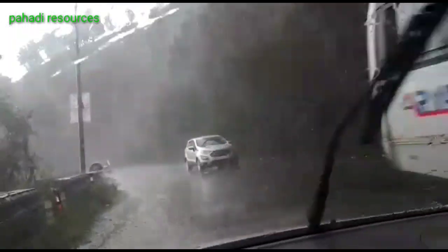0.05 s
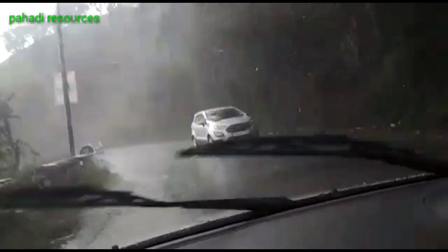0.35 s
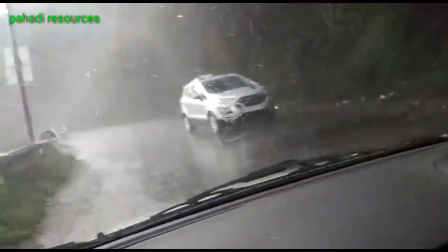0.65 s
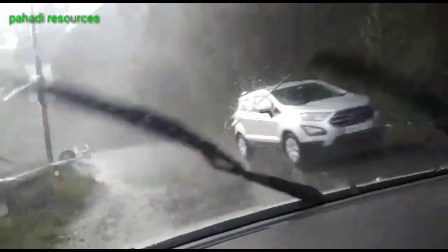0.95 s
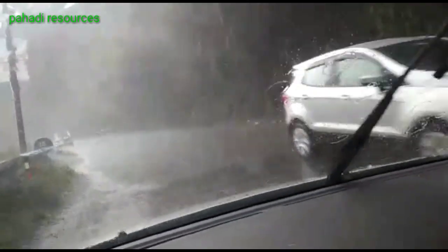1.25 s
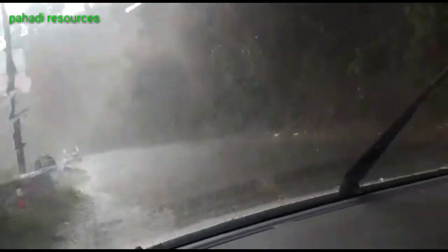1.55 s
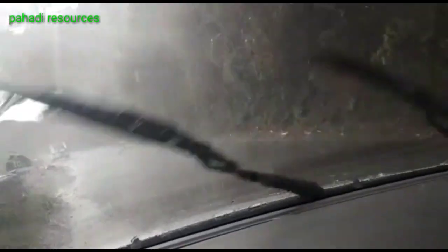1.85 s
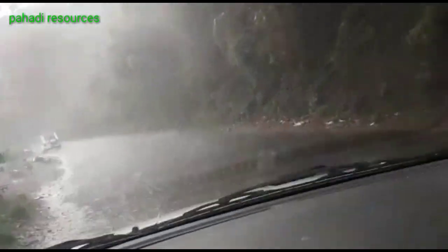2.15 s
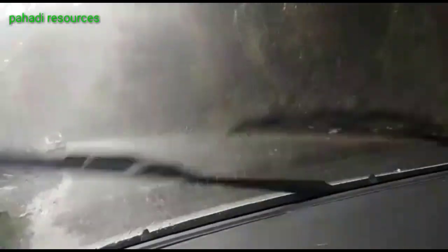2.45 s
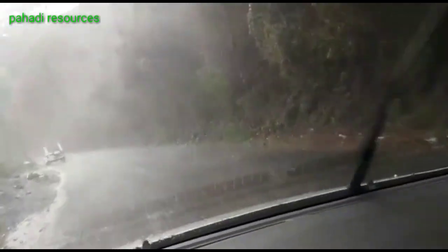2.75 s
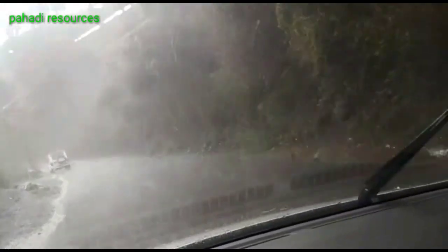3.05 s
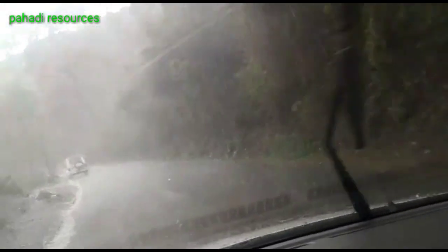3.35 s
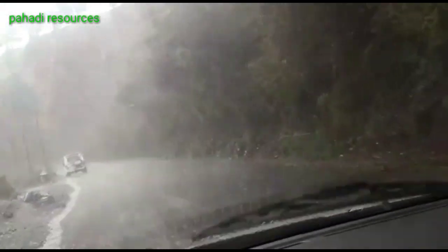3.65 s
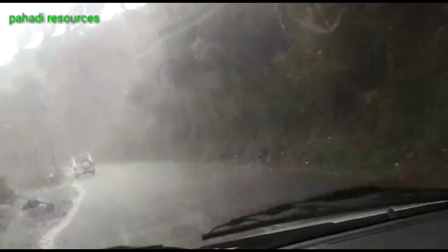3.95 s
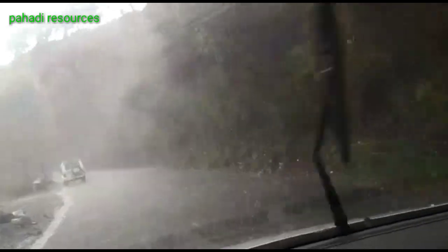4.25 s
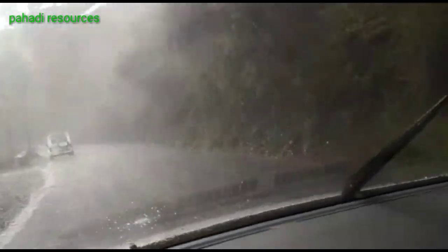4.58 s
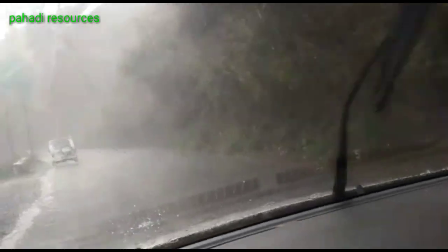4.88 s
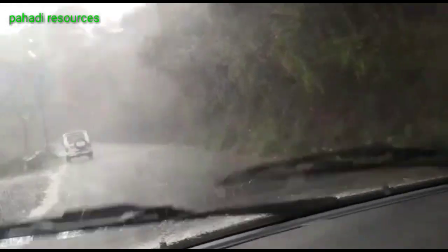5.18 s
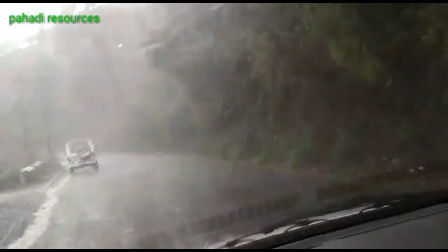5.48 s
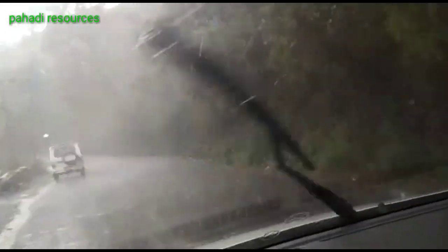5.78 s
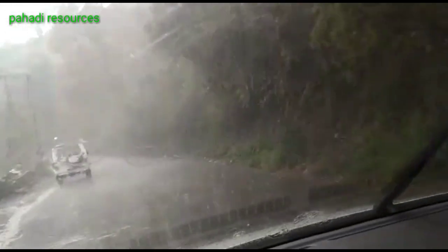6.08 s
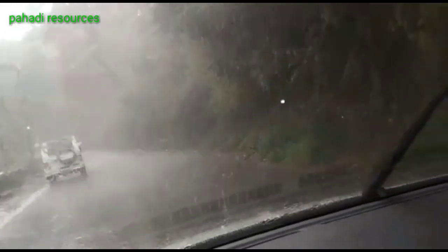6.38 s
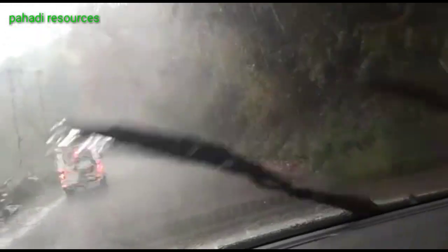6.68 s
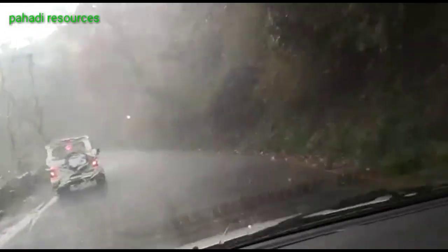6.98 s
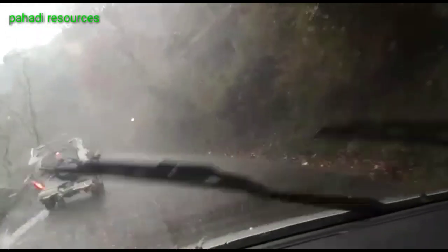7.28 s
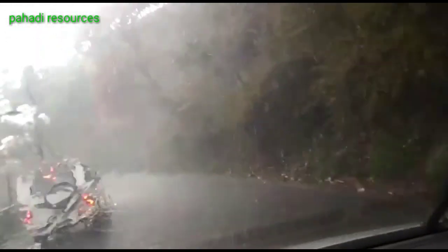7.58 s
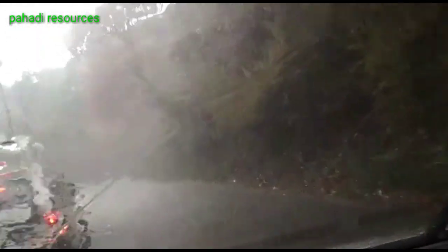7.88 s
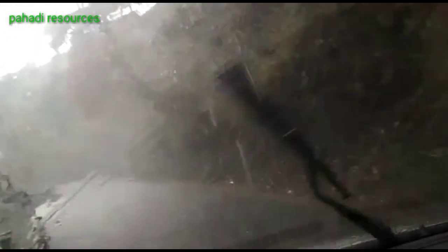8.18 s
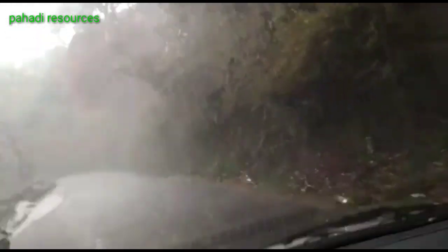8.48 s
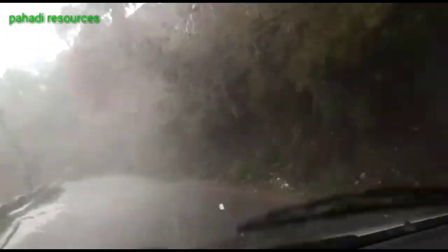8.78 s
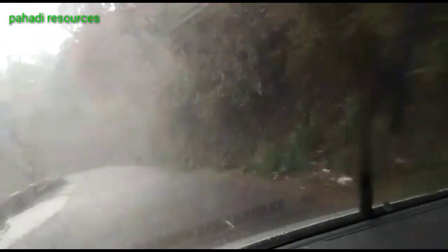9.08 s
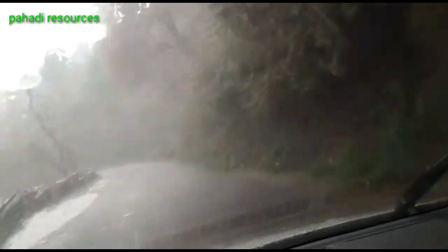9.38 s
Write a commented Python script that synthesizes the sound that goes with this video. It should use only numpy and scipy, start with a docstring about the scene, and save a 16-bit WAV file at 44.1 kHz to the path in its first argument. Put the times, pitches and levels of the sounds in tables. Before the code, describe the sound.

A downpour hits a car, heard from the cabin near the windshield. Clumps and sheets of water thud and patter on the roof with a hollow ring, over a low rumble of road and engine. Early on, an oncoming bus and then a car pass with a brief wet swish. After that, crisp, irregular ticks of single drops stand out from the fine hiss on the glass while the drumming carries on.

```python
"""Inside a slowly moving car in heavy rain, a stereo microphone close to the windscreen.
From the start, drops, clumps and sheets of water drum on the metal roof and ring in the cabin, rain hisses
on the glass, and road and engine rumble underneath. A bus splashes past at once, a car just before two
seconds. As their mist fades, hard drops begin to tick on the glass, each amid a flurry of small ones,
and keep on to the end."""
import sys
import numpy as np
from scipy import signal
from scipy.fft import rfft, irfft
from scipy.io import wavfile
from scipy.ndimage import uniform_filter1d

SR = 44100
rng = np.random.default_rng(int(sys.argv[2]) if len(sys.argv) > 2 else 0)


def put_to_file(sound):
    """Save the sound as 16-bit audio at rate SR, in the file named by the first command-line argument."""
    columns = np.atleast_2d(sound).T  # one column per channel
    safe = np.clip(columns, -1, 1)
    whole_steps = np.round(safe * 32767)
    wavfile.write(sys.argv[1], SR, whole_steps.astype(np.int16))


N = 424683

# Heavy clumps of water overhead. Each row: time in seconds, relative level in dB, patter and spatter trims
# in dB, the panel's note in Hz, its trim in dB, rough time from first drop to thickest in seconds.
ROOF_CLUMPS = [(0.229, -33.5, -17, -20, 558, -6, .01), (0.297, -42, -22, -33, 297, -5, 0.01),
               (0.392, -35, -19, -29, 377, -7.5, 0.009), (0.496, -22.5, -9.5, -34, 372, -12, 0.0054),
               (.519, -27, -7, -29, 331, -9, 0.0069), (0.559, -37.5, -2.5, -24, 288, -3.5, 0.012),
               (0.655, -35.5, -1.5, -20, 632, -12, .01), (0.82, -36, -11, -14, 415, -10.5, 0.0086),
               (0.99, -36.5, 0, -14, 542, -23, 0.013), (1.06, -38.5, -5, -12.5, 295, -0.5, 0.014),
               (1.12, -34.5, -6, -33, 376, -10, 0.0084), (1.272, -29, -10, -23, 392, -13.5, 0.0065),
               (1.375, -34, -15, -21, 435, -13, 0.011), (1.51, -34.5, -12, -34, 598, -12.5, 0.0022),
               (1.668, -37.5, -1, -9, 396, -3, 0.0095), (1.852, -28.5, -8.5, -20, 437, -11, .01),
               (1.944, -34, -8, -12, 402, -8, 0.013), (2.136, -36.5, -24, -18, 436, -10, 0.0073),
               (2.232, -46.5, -19, -3, 637.5, -1, .01), (2.459, -32, -5, -16, 431, -13, 0.011),
               (2.591, -25, -4.5, -28, 404, -5.5, 0.0092), (2.654, -30.5, -4, -35, 628, -7.5, .01),
               (2.717, -34, -9, -34, 370, -12, 0.011), (2.788, -40, -23, -40, 370, -4, 0.00996),
               (2.835, -35, -17, -32, 398, -13, 0.0058), (2.98, -47, -17, -30, 605, 1, .008),
               (3.018, -44.5, 2, -25, 598, -5.5, .009), (3.245, -41.5, -8, -23, 448.5, -23, 0.009),
               (3.52, -30.5, -5, -18, 604.4, -6.5, .016), (3.765, -29, -11, -19.5, 433, -5.5, 0.011),
               (3.82, -30, -24, -30, 428.3, -13, .006), (3.854, -33, -9, -30, 362, -8, 0.0031),
               (4.03, -50, 7, -1.5, 463, -5, 0.016), (4.194, -26.5, -1, -20, 278.6, -15, 0.017),
               (4.422, -32, -5, -17.5, 419, -23, 0.0093), (4.51, -46.5, 6.5, -7, 560, -5, 0.01),
               (4.666, -39, -4, -16, 444, -10.5, 0.0043), (4.73, -29, -14, -15.5, 389, -6, 0.0082),
               (4.838, -49.5, 9, 2, 590, -4, 0.011), (4.968, -44.5, -1, -9, 406.3, 2.5, 0.0065),
               (5.02, -44, -8, -30, 405, -6, .005), (5.047, -42.5, -11, -31, 393.6, -4, 0.0082),
               (5.2, -44, -4, -36, 586, -12, 0.0029), (5.269, -37, -16, -38, 609, -24, 0.0018),
               (5.373, -40.5, -5, -21, 490, -22, 0.002), (5.416, -48, 4, -20, 427, -23, 0.0017),
               (5.526, -41, -3, -35, 414, 1.5, 0.0095), (5.755, -32, -26, -17.5, 394, -5, .012),
               (5.79, -45, -19, -30, 420, 0, 0.0083), (5.877, -41.5, 4.5, -7, 404, -11, 0.0042),
               (6.015, -36.5, -22, -25, 416.4, -17, 0.0067), (6.173, -42.5, 3.5, -20, 417, -1, 0.0077),
               (6.22, -50, -12, -33, 403.5, 4, .007), (6.29, -35.5, -5, -27, 401, -5, 0.011),
               (6.494, -38.5, -11, -40, 421, -10, 0.014), (6.595, -39, -9, -36, 398, -3.5, .006),
               (6.639, -49, -4, -24, 404, -6, 0.0063), (6.748, -39.5, 1, -11.5, 604, -12, 0.006),
               (6.808, -37, -8, -18, 608, -9, 0.0021), (6.949, -35, -6, -21, 397.4, -5.5, 0.0084),
               (7.038, -36.5, -4, -22, 402.5, -1.5, 0.0073), (7.198, -40, -29, -9.5, 345, -6.5, 0.0091),
               (7.315, -44, 5, -20, 628, -3, 0.011), (7.408, -34.5, -2, -3.5, 554, -4.5, .011),
               (7.656, -37, 0, -29, 406, -2.5, 0.014), (7.767, -47, -5, -27, 448, -10, 0.0015),
               (7.851, -56, 11, 3, 403, 3, 0.0054), (7.885, -55, 9, 6, 422, -8, 0.016),
               (8.026, -35.5, -7, -21, 427.5, -9.5, 0.0072), (8.128, -33.5, -5, -18, 405, -8, 0.013),
               (8.203, -50, 12, 8, 441, -16, 0.013), (8.314, -32, -14, -24, 403, -9, .005),
               (8.435, -37.5, -7, -22, 405, -4.5, .012), (8.651, -58, 8, -20, 561, 1, .015),
               (8.828, -44.5, -0.5, -25, 444, -14, 0.0045), (8.877, -39, -2, -6, 605, -11, .014),
               (9.0, -35, -9, -12, 435, -9, 0.015), (9.245, -55, -11, -25, 420, -8, 0.012),
               (9.415, -50.5, 11.5, 1, 352.3, -7, .018), (9.536, -34.5, -13, -17, 304, -11, 0.014)]
# Bright modes set off by a spatter. Each row: pitch in Hz, trim in dB, time to fall 60 dB in seconds.
SPATTER_MODES = [(1470, -14, 0.17), (2150, -13.5, 0.22), (2330, -13, 0.14), (2710, -17, 0.17)]
# Water pouring across the roof. Each row: start and length in seconds, drumming and patter gains in dB.
ROOF_SHEETS = [(.13, .14, -40, -31), (0.415, 0.067, -31, -36), (1.31, 0.095, -31.5, -34),
               (1.443, 0.047, -36, -41), (1.882, 0.16, -34, -39), (2.61, 0.13, -37, -42),
               (3.292, 0.14, -57, -39.5), (3.421, 0.068, -37, -47), (3.558, 0.053, -34, -33),
               (4.114, 0.062, -38, -56), (4.333, 0.065, -44, -53), (4.464, .05, -48, -40),
               (4.672, 0.056, -33.5, -38), (4.968, .11, -38, -40), (5.11, .06, -47, -39.5),
               (5.503, .17, -40, -40), (5.722, .15, -34, -39.5), (6.098, 0.033, -45, -43.5),
               (6.2, 0.16, -34.5, -45), (6.496, .17, -30.5, -37.5), (6.857, .07, -32.5, -45),
               (6.931, 0.06, -40, -35.5), (7.06, 0.074, -32.5, -54), (7.24, .06, -39, -44),
               (7.423, 0.054, -49, -37.5), (7.67, 0.061, -31.5, -45), (8.175, 0.072, -43, -40),
               (8.87, .06, -33, -37), (9.073, .09, -43.5, -37)]
# Small drops overhead. Each row: time in seconds, relative level in dB.
ROOF_RAIN = [(0, -37), (.35, -37.5), (.75, -43), (1.22, -42.5), (1.6, -40.5), (2.05, -39), (2.35, -38.5),
             (2.9, -42), (3.2, -43.5), (3.5, -46), (3.78, -36.5), (3.98, -44), (4.3, -42.5), (4.6, -44),
             (4.9, -43.5), (5.25, -49.5), (5.8, -43.5), (6.2, -45.5), (6.44, -48), (6.8, -46), (7.1, -45),
             (7.6, -43.5), (8.1, -47.5), (9.63, -44.5)]
# Hard drops on the glass. Each row: time in seconds, relative level in dB, trim of the pane's ring in dB,
# left minus right in dB.
GLASS_TICKS = [(2.569, -50, -16, 2), (2.608, -26.5, -22, 3), (2.787, -26.5, -30, -1),
               (2.892, -37.5, -13, 16), (3.237, -32, -29, -7), (3.353, -33.5, -14, -8), (3.502, -48, -2, 3),
               (3.549, -32.5, -14, -9), (3.693, -28, -11, -6), (3.773, -28, -21, -3), (4.202, -37, -3, -2),
               (4.419, -34, -20, 3), (4.667, -29.5, -3.5, 1), (4.738, -31.5, 1, 4), (4.838, -31, -14, 6),
               (5.198, -36, -30, 1), (5.311, -23, -19, 0), (5.879, -27, -6, -2), (6.242, -27.5, -4.5, 5),
               (6.809, -30.5, -12, 7), (6.889, -26.5, -3.5, 6), (6.934, -24.5, -25, 0),
               (7.034, -39, -4, 12), (7.178, -28, -9, 3), (7.311, -29.5, -28, -6), (7.472, -22, -17, -3),
               (7.929, -32, -5, 5), (7.999, -34, -12, 8), (8.022, -28, -9, 6), (8.209, -33, -17, -6),
               (8.315, -20.5, -14.5, 1), (8.362, -28.5, -12.5, 7), (8.564, -33, -23, 9),
               (8.703, -34, 1.5, 0), (8.751, -29, -10, 8), (8.961, -50, 7, 14), (9.151, -45, 1, 7),
               (9.276, -36, -8, 6)]
# Rain on the windscreen. Each row: time in seconds, strength in dB.
GLASS_RAIN = [(0, -49), (.15, -46), (.5, -46), (.8, -48.5), (1.2, -51), (1.4, -49.5), (2, -47), (2.5, -50),
              (2.95, -52), (3.4, -50.5), (3.75, -48), (4.05, -53), (4.33, -50.5), (4.6, -50.5),
              (4.91, -49.5), (5.12, -52.5), (5.39, -51.5), (5.67, -50), (5.9, -48.5), (6.15, -48.5),
              (6.4, -57), (6.6, -52), (6.96, -50.5), (7.15, -49), (7.35, -49.5), (7.65, -51), (7.9, -51),
              (8.14, -50.5), (8.6, -51.5), (8.95, -50.5), (9.63, -51)]
# Fine drops thrown at the glass by gusts. Each row: peak time and half length in seconds, added dB.
GUST_SPURTS = [(2.33, 0.02, 2), (3.1, 0.029, 2.5), (3.179, 0.027, 4), (3.546, 0.029, 2), (3.68, 0.061, 1),
               (3.889, 0.035, 3), (4.2, 0.025, 2.5), (4.46, 0.024, 3), (4.694, .025, 3), (5.499, .025, 3),
               (6.333, 0.057, 6.5), (6.94, .04, 5.5), (7.225, 0.023, 3.5), (7.395, .04, 0),
               (7.773, 0.027, -0.5), (8.04, .04, 0.5), (8.215, 0.055, 5.5), (8.603, .025, 2),
               (9.22, 0.036, 1.5)]
# Oncoming bus, then car. Each row: time when nearest and half length in seconds, roar and splash in dB.
PASSING_VEHICLES = [(.2, 0.26, -33, -46.5), (1.75, 0.84, -49.5, -47)]
# The road from inside. Each row: time in seconds, relative levels of body rumble and cabin boom in dB.
ROAD_LEVELS = [(0, -36, -28.5), (.25, -21, -19), (.5, -30, -34.5), (.86, -31, -39), (.95, -26, -33.5),
               (1.5, -22.5, -26), (1.8, -27.5, -32), (2.7, -26.5, -31.5), (3.2, -29, -27.5),
               (3.95, -27, -30), (4.25, -24.5, -25.5), (4.8, -27, -26), (5.6, -21.5, -24.5),
               (6, -27, -24.5), (6.75, -25, -26.5), (7, -20.5, -22.5), (7.4, -28.5, -24),
               (7.8, -20.5, -23.5), (9.63, -19.5, -25)]
# The engine. Each row: time in seconds, firing rate in Hz, relative levels of multiples 2, 3 and 4 in dB.
ENGINE_ORDERS = [(0, 34.3, -33, -26, -15.5), (.3, 33.66, -42, -34, -47), (.7, 34, -34, -47, -40),
                 (1.2, 33.28, -45, -45, -31), (1.5, 33.4, -19.5, -38, -43), (1.95, 31.34, -45, -36, -24),
                 (2.3, 33.3, -30, -30.5, -36.5), (3.2, 34.28, -34, -32.5, -29.5), (4, 34.29, -55, -53, -31),
                 (5.1, 34.05, -55, -34, -30), (6.2, 33.4, -25.5, -44, -33), (6.7, 33.4, -30, -36, -30.5),
                 (7.05, 33.08, -26, -38, -30.5), (7.42, 31.8, -23, -18.5, -34), (7.9, 32.95, -30, -41, -42),
                 (8.7, 33.69, -40, -34, -28), (9.2, 33.32, -26, -29, -33.5), (9.63, 32.02, -21, -22.5, -33)]
# The body's lowest resonance. Each row: time in seconds, pitch in Hz, relative level in dB.
BODY_SHUDDER = [(0, 47.56, -26), (.6, 42.54, -38), (1.3, 36.93, -47), (2.6, 36.9, -38.5), (3, 39.12, -31.5),
                (3.85, 39.5, -29.5), (4.05, 42.94, -46), (4.25, 45.3, -29), (4.8, 38.83, -38),
                (5.2, 38.49, -27), (5.7, 36.1, -33), (6.3, 38.71, -34), (9.63, 38.58, -43)]

# Tone colours from inside the car. Each row: frequency in Hz, relative level in dB.
ROOF_THUD = [(120, -6.5), (250, -23.5), (310, -4), (395, -2), (450, 2), (515, -3), (612, -2), (700, -6.5),
             (790, -25.5), (1200, -17.5), (3000, -72.5)]  # sheet metal under a clump
ROOF_PATTER = [(500, -7.5), (770, -15), (900, 4), (1050, 4), (1178, 7.5), (1330, -2), (1494, 9),
               (1600, 2.5), (1850, 1.5), (2350, -22), (2720, -7), (3150, -27), (4800, -17.5), (7000, -44),
               (16000, -47)]  # water scattering on the roof
ROOF_SPATTER = [(1300, -17), (1850, 14.5), (2300, 6.5), (2700, 11), (3150, 5), (4800, 0), (7000, -7),
                (16000, -23)]  # its brightest part
ROOF_DRIP = [(120, -26.5), (250, -17), (310, -4), (385, -3), (445, -8.5), (520, -3.5), (615, 0), (690, -3),
             (790, -16), (1200, -33), (3000, -74)]  # small drops stir the roof's higher mode
ROOF_DRUM = [(120, -27), (255, -27.5), (330, -5), (410, -1), (450, 0), (495, -6.5), (640, -9), (750, -18),
             (1200, -49), (3000, -73)]  # a weight of water swings its low one
CABIN_HOLLOW = [(250, -37.5), (340, 2), (390, -5), (435, -0.5), (500, -2), (600, -1), (780, -30),
                (930, -27), (1320, -5), (1490, -6), (1700, -26), (2720, -11), (3500, -37)]  # the air ringing after a blow
GLASS_PANE = [(1500, 1), (2700, 1.5), (3200, -5.5), (3900, 8), (5050, 11), (5800, 7.5), (6600, -9),
              (7400, -40), (9000, -5.5), (16000, -48)]  # the struck windscreen
GLASS_SPRAY = [(4000, -8), (7300, -14), (8500, -1.5), (9500, 2), (10600, 6), (11900, 0), (12500, 2.5),
               (14000, 2), (16000, -5.5)]  # droplets bursting on it
TRAFFIC_ROAR = [(100, -13), (160, 11.5), (230, -12.5), (330, 1), (500, 0.5), (800, -19), (2000, -89)]  # a vehicle going by outside
TYRE_SPLASH = [(800, -13), (1500, -8), (2000, 12.5), (2400, -9), (2750, 1), (3300, -21), (5000, 2),
               (7300, -14), (10000, -7), (16000, -13)]  # water off its tyres
BODY_RUMBLE = [(12, -22.5), (22, -14.5), (32, -3.5), (41, -0.5), (52, -0.5), (66, 1), (78, -3.5),
               (100, -24.5), (200, -87.5)]  # the body shaken by the road
CABIN_BOOM = [(55, -22.5), (80, -4), (97, 2.5), (118, -2.5), (140, -0.5), (160, -3), (182, -16.5),
              (230, -19), (300, -29.5), (600, -102)]  # the air booming above that

# Stereo width at the microphone. Each row: frequency in Hz, gain of the side signal in dB.
MIC_WIDTH = [(25, -26), (60, -23.5), (140, -22.5), (380, -8), (700, -4), (1290, -1), (2380, 0)]
# Balance of its two ports. Each row: frequency in Hz, left minus right in dB.
MIC_BALANCE = [(150, -0.5), (380, -4.5), (700, -7), (1290, 3), (2380, -6), (4400, 7.5), (8120, -1),
               (15000, 5)]

OVERTONE_RATIO, OVERTONE_DB = 1.9, -15  # a weaker roof mode above the panel's note
PATTER_LAG = 1.3  # scattering water takes this many times longer to land than the thud
SHEET_RISE_S, SHEET_FALL_S = 0.014, 0.02
FLURRY_RISE_S, FLURRY_FALL_S = 0.0041, 0.037
HOLLOW_DB, HOLLOW_T60_S = -10, 0.35
USUAL_RAIN_DB, PANE_DB, SPRAY_DB = -50.5, -54.5, -57  # usual strength, and the base gains it gives
SPRAY_GROWTH = 1.96  # dB of spray per dB of rain
MIST_DB, MIST_FADE_S = 8.5, 2.78  # extra spray in the wake of the traffic


def roof_clumps():
    """Heavy clumps just overhead: the panel thuds and sounds its note, the water patters and spatters."""
    out = np.zeros((2, N))
    for s, db, patter_db, spatter_db, note_hz, note_db, spread in ROOF_CLUMPS:
        thud = clump(ROOF_THUD, spread, t60=0.025, tail_db=-8, tail_t60=0.36)
        patter = clump(ROOF_PATTER, PATTER_LAG * spread, t60=0.07, tail_db=-4, tail_t60=0.3)
        spatter = clump(ROOF_SPATTER, spread, t60=0.052, tail_db=-10, tail_t60=0.34)
        water = undb(-1.5) * thud + undb(patter_db) * patter + undb(spatter_db) * spatter
        add(out, undb(db - 9.5) * water, s - .002)
        # the note starts as the clump thickens
        for hz, mode_db in (note_hz, 0), (OVERTONE_RATIO * note_hz, OVERTONE_DB):
            note = unit(ping(hz, t60=.2))
            add(out, undb(db + note_db + mode_db - 0.56) * note, s + 0.584 * spread)
        for hz, mode_db, t60 in SPATTER_MODES:
            ring_hz = hz * (1 + 0.012 * rng.standard_normal())
            add(out, undb(db + spatter_db + mode_db) * unit(ping(ring_hz, t60)), s + spread)
    return out


def roof_sheets():
    """Sheets of water sweep the roof: drops so dense that they blend into a swish over round drumming."""
    t = np.arange(N) / SR
    drumming = shower(ROOF_DRUM, per_s=300, scatter_db=3, t60=.07, tail_db=-9, tail_t60=.2)
    plops = pings(ROOF_DRUM, low_hz=340, high_hz=640, scatter_db=3, t60=.12, count=900)
    patter = shower(ROOF_PATTER, per_s=700, scatter_db=4, t60=.05, tail_db=-8, tail_t60=.2)
    drum_gain, patter_gain = np.zeros((2, N))
    for start, length, drum_db, patter_db in ROOF_SHEETS:
        end = start + length
        corners = [start - SHEET_RISE_S, start, end, end + SHEET_FALL_S]
        flow = np.interp(t, corners, [0.0043, 0.61, 0.52, 0.00024])
        drum_gain += undb(drum_db) * flow
        patter_gain += undb(patter_db) * flow
    return drum_gain * unit(drumming + plops) + patter_gain * patter


def cabin_ring(x):
    """The air around the microphone rings on after the roof, mostly on its low hollow modes."""
    t = np.arange(SR // 2) / SR
    build_up = 1 - np.exp(-t / 0.024)
    tail = rng.standard_normal((2, len(t))) * undb(-60 * t / HOLLOW_T60_S) * build_up
    tail = colour(tail / np.sqrt(np.sum(tail ** 2) / 2), CABIN_HOLLOW)
    return x + undb(HOLLOW_DB) * signal.oaconvolve(x, tail, axes=1)[:, :N]


def roof_rain():
    """Small drops come low and dull through the roof lining: a wash with pitched knocks and taps in it."""
    roof_db = curves(ROOF_RAIN)[0] + 1.5 * flurries(ROOF_CLUMPS) + 1.2 * walk(20)
    thud = shower(ROOF_DRIP, per_s=160, scatter_db=2.5, t60=0.074, tail_db=-22, tail_t60=0.1)
    patter = shower(ROOF_PATTER, per_s=480, scatter_db=-1, t60=0.054, tail_db=-5, tail_t60=0.21)
    knocks = pings(ROOF_DRIP, low_hz=257, high_hz=758, scatter_db=-7, t60=0.11, count=380)
    taps = pings(ROOF_PATTER, low_hz=780, high_hz=3000, scatter_db=10, t60=.085, count=1900)
    return undb(roof_db) * (undb(-5) * (thud + knocks) + undb(-4) * (patter + taps))


def glass_ticks():
    """Hard drops on the windscreen, close to the microphone: a crack, a knock and a fizz of droplets."""
    out = np.zeros((2, N))
    for s, db, pane_db, pan_db in GLASS_TICKS:
        fizz = crack(GLASS_SPRAY, snap_t60=.013, ring_db=-7, tail_db=-15)
        knock = clump(ROOF_PATTER, spread=.0008, t60=.04, tail_db=-16, tail_t60=.11)
        pane = crack(GLASS_PANE, snap_t60=.008, ring_db=-9, tail_db=-20) + undb(-9) * knock
        mid, side = undb(db - 27.5) * (fizz + undb(pane_db + 6.5) * pane)
        pan = undb(np.array([[pan_db], [-pan_db]]) / 2)
        add(out, np.array([mid + side, mid - side]) * pan, s)
    return out


def glass_rain():
    """Close up, the windscreen answers the rain high and crisp, and bursting droplets fizz on it."""
    t = np.arange(N) / SR
    spurts_db = sum(db * np.exp(-((t - s) / half_s) ** 2) for s, half_s, db in GUST_SPURTS)
    strength_db = curves(GLASS_RAIN)[0] - USUAL_RAIN_DB + spurts_db
    flicker = walk(26)
    flurry = .75 * flurries(GLASS_TICKS) + .25 * flurries(ROOF_CLUMPS)
    mist = np.exp(-(t / MIST_FADE_S) ** 2)
    glass_db = PANE_DB + strength_db + 1.5 * flurry + (1 - mist) * 1.8 * flicker
    spray_db = SPRAY_DB + SPRAY_GROWTH * strength_db + MIST_DB * mist
    spray_db += (1 - mist) * (3.5 * flurry + 2 * flicker)  # while it lasts, the mist keeps the spray even
    glass = shower(GLASS_PANE, per_s=900, scatter_db=6, t60=0.031, tail_db=8, tail_t60=0.05)
    spray = shower(GLASS_SPRAY, per_s=720, scatter_db=5.5, t60=0.025, tail_db=12, tail_t60=0.08)
    droplets = pings(GLASS_PANE, low_hz=2400, high_hz=6500, scatter_db=9, t60=.03, count=3000)
    fizz = pings(GLASS_SPRAY, low_hz=7000, high_hz=15500, scatter_db=8, t60=.025, count=5000)
    return undb(glass_db) * (glass + .5 * droplets) + undb(spray_db) * (spray + .5 * fizz)


def flurries(events):
    """Small drops thicken just before each heavy one and thin out after it, on a scale of 0 to 1."""
    t = np.arange(N) / SR
    starts = np.sort([row[0] for row in events])
    landed = np.searchsorted(starts, t)
    since = t - np.r_[-np.inf, starts][landed]
    until = np.r_[starts, np.inf][landed] - t
    return np.maximum(np.exp(-(since / FLURRY_FALL_S) ** 2), np.exp(-until / FLURRY_RISE_S))


def blow_fade(t, t60, tail_db, tail_t60):
    """Decay of one blow on a panel: crowded modes die fast, the cabin holds a longer tail."""
    return undb(-60 * t / t60) + undb(tail_db - 60 * t / tail_t60)


def clump(spectrum, spread, t60, tail_db, tail_t60, count=6):
    """A leading drop and its followers land close together, thickest after about spread seconds."""
    t = np.arange(SR // 3) / SR
    power = np.zeros(len(t))
    one_drop = blow_fade(t, t60, tail_db, tail_t60) ** 2
    # the drops ring unrelated modes, so their powers add
    for delay in np.linspace(0, 2, count) * rng.uniform(0.61, 1.3, count):
        start = min(int(delay * spread * SR), SR // 8)
        power[start:] += undb(-7 * abs(delay - 1)) * one_drop[:len(t) - start]
    return unit(colour(rng.standard_normal((2, len(t))) * np.sqrt(power), spectrum))


def shower(spectrum, per_s, scatter_db, t60, tail_db, tail_t60, spots=6):
    """Drops of scattered size fall at random on several spots, each with a ring of its own."""
    fade = blow_fade(np.arange(SR // 3) / SR, t60, tail_db, tail_t60)
    out = 0
    for _ in range(spots):
        ring = colour(rng.standard_normal((2, len(fade))) * fade, spectrum)
        ring /= np.sqrt(np.sum(ring ** 2) / 2)
        lands = rng.random(N) < per_s / spots / SR
        sizes = undb(scatter_db * np.clip(rng.standard_normal(N), -2, 2)) * rng.choice([-1, 1], N)
        out = out + signal.oaconvolve((lands * sizes)[None], ring, axes=1)[:, :N]
    return unit(out)


def crack(spectrum, snap_t60, ring_db, tail_db):
    """One hard drop on glass: a needle-sharp snap, a brief ring and a faint tail."""
    t = np.arange(SR // 3) / SR
    fade = blow_fade(t, snap_t60, tail_db, tail_t60=.17) + undb(ring_db - 60 * t / .05)
    return unit(colour(rng.standard_normal((2, len(t))) * fade, spectrum))


def ping(hz, t60):
    """One damped mode, reaching the microphone with a chance phase between mid and side."""
    t = np.arange(int(min(t60, .3) * SR)) / SR
    phase = np.array([[0], [rng.uniform(0, 2 * np.pi)]])
    attack = 1 - np.exp(-t / 0.000097)
    return np.sin(2 * np.pi * hz * t + phase) * undb(-60 * t / t60) * attack


def pings(spectrum, low_hz, high_hz, scatter_db, t60, count):
    """Each drop favours the one mode that bulges where it lands, so each has its own pitch."""
    out = np.zeros((2, N))
    for when, note, size in rng.random((count, 3)):
        hz = low_hz * (high_hz / low_hz) ** note
        add(out, undb(scatter_db * size ** 2) * ping(hz, t60), when * N / SR)
    return unit(colour(out, spectrum))


def traffic():
    """Outside, each oncoming vehicle swells and fades: a low roar, and water thrown up by its tyres."""
    t = np.arange(N) / SR
    roar = unit(colour(rng.standard_normal((2, N)), TRAFFIC_ROAR))
    splash = shower(TYRE_SPLASH, per_s=1500, scatter_db=14, t60=0.025, tail_db=-4, tail_t60=0.13, spots=3)
    out = 0
    for s, half_s, roar_db, splash_db in PASSING_VEHICLES:
        nearness = np.exp(-((t - s) / half_s) ** 2)
        out = out + nearness * (undb(roar_db) * roar + undb(splash_db) * splash)
    return out


def road_rumble():
    """The road shakes the body from below; the cabin air booms at a higher pitch."""
    road_db, boom_db = curves(ROAD_LEVELS)
    body = drone(BODY_RUMBLE, evenness=0.41)
    air = drone(CABIN_BOOM, evenness=1)
    return undb(road_db - 2.5) * body + undb(boom_db - 1) * air


def engine():
    """Multiples of the firing rate swell and fade in the cabin as the load changes."""
    firing_hz, *orders_db = curves(ENGINE_ORDERS)
    return sum(hum(order * firing_hz, db - 3.5, waver=0.0114, throb_db=1.5)
               for order, db in enumerate(orders_db, 2))


def body_shudder():
    """The body drones on its lowest resonance over rougher stretches of road."""
    hz, db = curves(BODY_SHUDDER)
    return hum(hz, db + 2, waver=0.035, throb_db=1)


def drone(spectrum, evenness):
    """Random shaking through a set of resonances, with the deepest swells evened out."""
    shaking = colour(rng.standard_normal((2, N)), spectrum)
    power = uniform_filter1d(uniform_filter1d(shaking ** 2, SR // 10), SR // 16)
    return unit(shaking / (np.abs(power) + 1e-12) ** (evenness / 2))


def hum(hz, db, waver, throb_db):
    """A low tone that wavers in pitch and throbs in level."""
    phase = 2 * np.pi * np.cumsum(hz * (1 + waver * walk(8))) / SR
    return undb(db + throb_db * walk(9.1)) * unit(np.sin(phase))


def walk(per_s):
    """Random values joined by straight lines."""
    return np.interp(np.arange(N) / SR * per_s, np.arange(256), rng.standard_normal(256))


def undb(db):
    """Decibels to gain."""
    return 10 ** (np.asarray(db) / 20)


def unit(x):
    """Scale to rms 1."""
    return x / np.sqrt(np.mean(x ** 2))


def curves(table):
    """The columns of a table that follow its time column, sample by sample."""
    s, *columns = np.transpose(table)
    return [np.interp(np.arange(N) / SR, s, column) for column in columns]


def colour(x, spectrum):
    """Causal filter with the given (Hz, dB) response, built from its cepstrum."""
    size = 8192
    hz, db = np.transpose(spectrum)
    log_hz = np.log(np.fft.rfftfreq(size, 1 / SR) + 1)
    log_gain = np.log(undb(np.interp(log_hz, np.log(hz), db)))
    cepstrum = irfft(log_gain)[:size // 2]
    cepstrum[1:] *= 2
    response = irfft(np.exp(rfft(cepstrum, size)))[:size // 2]
    return signal.fftconvolve(x, response[None], axes=1)[:, :x.shape[1]]


def add(out, sound, s):
    """Mix a sound in at s seconds."""
    start = max(int(s * SR), 0)
    out[:, start:start + sound.shape[1]] += sound[:, :N - start]


def scene():
    """At the microphone, the bass reaches both ports alike and the treble comes from all round."""
    roof = cabin_ring(roof_clumps() + roof_sheets()) + roof_rain()
    mid, side = roof + glass_rain() + traffic() + road_rumble()
    mid = mid + engine() + body_shudder()
    side = colour(side[None], MIC_WIDTH)
    left = colour(mid + side, [(hz, db / 2) for hz, db in MIC_BALANCE])
    right = colour(mid - side, [(hz, -db / 2) for hz, db in MIC_BALANCE])
    return np.vstack([left, right]) + glass_ticks()


def record(dry):
    """The phone that serves as microphone cuts the top above 15.8 kHz."""
    return signal.sosfilt(signal.ellip(10, .2, 70, 15800, fs=SR, output="sos"), dry)


dry = scene()
out = record(dry)
put_to_file(out)
```